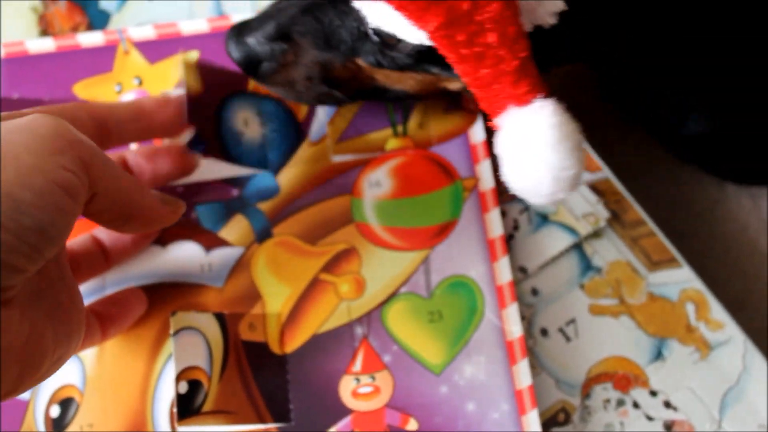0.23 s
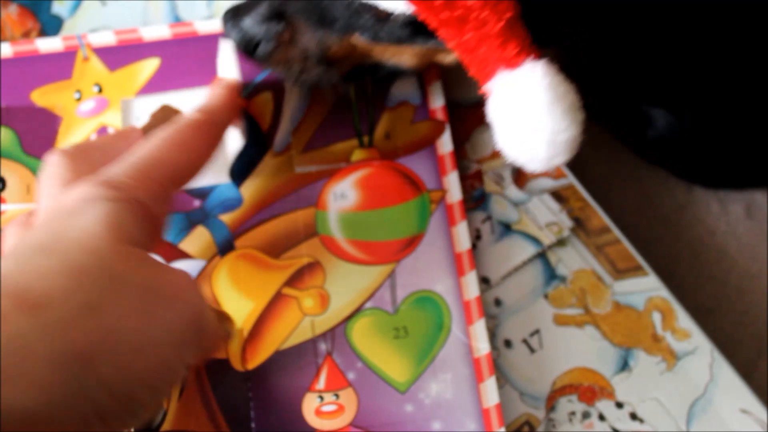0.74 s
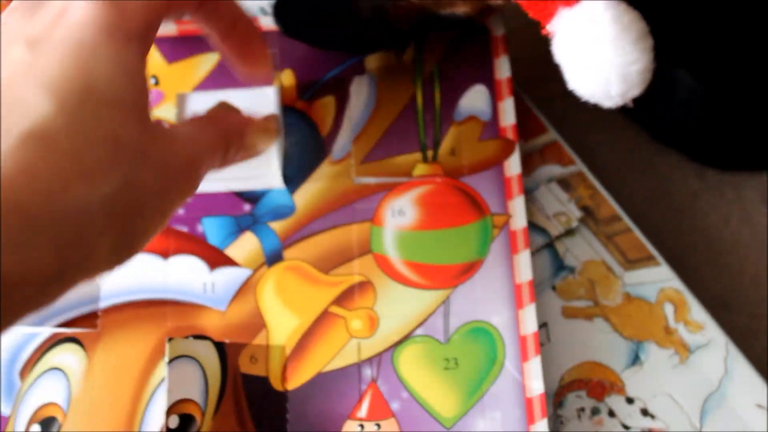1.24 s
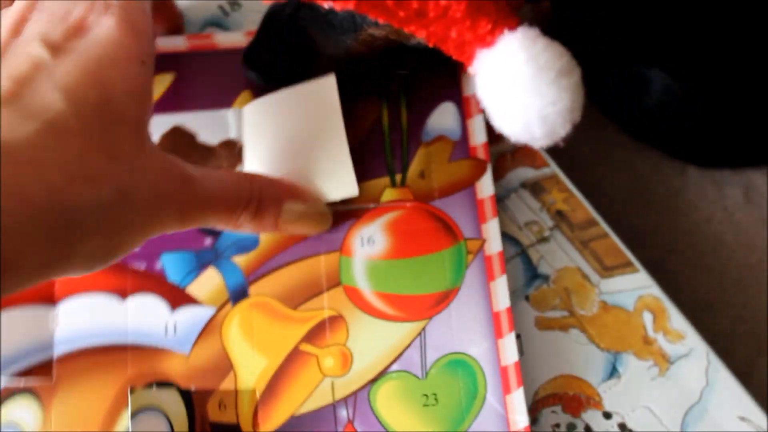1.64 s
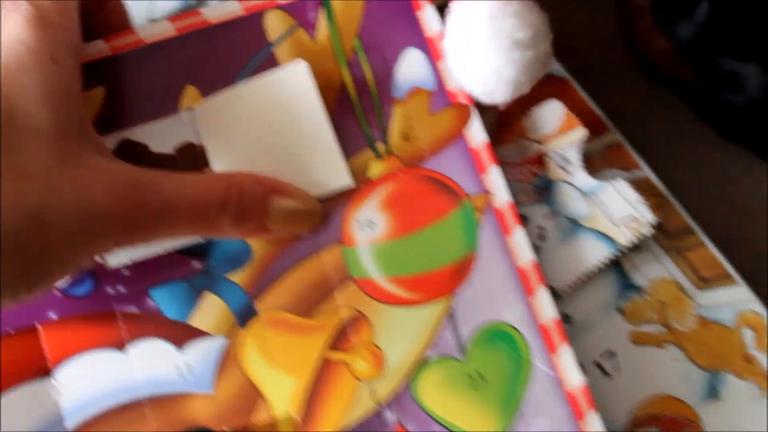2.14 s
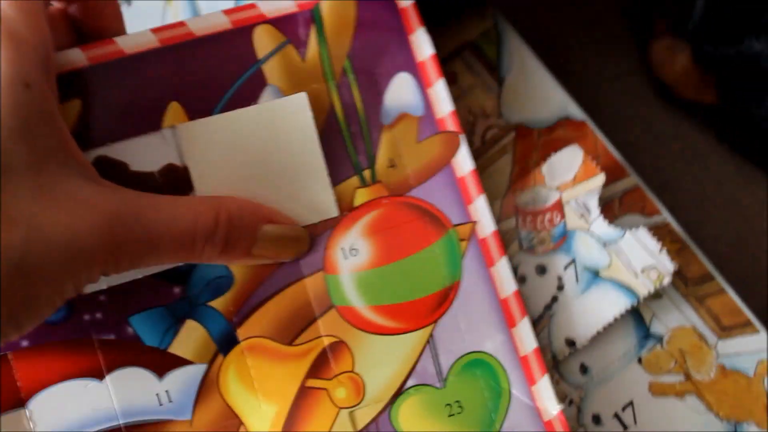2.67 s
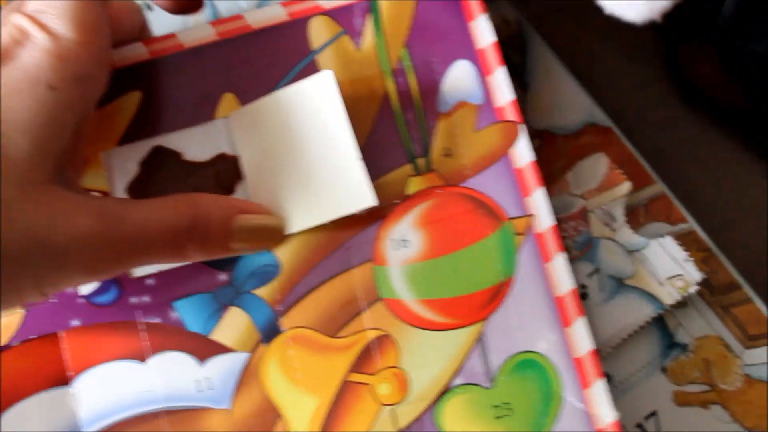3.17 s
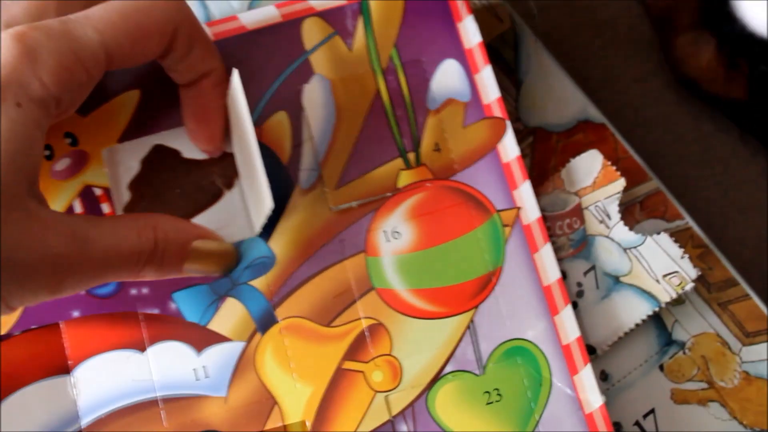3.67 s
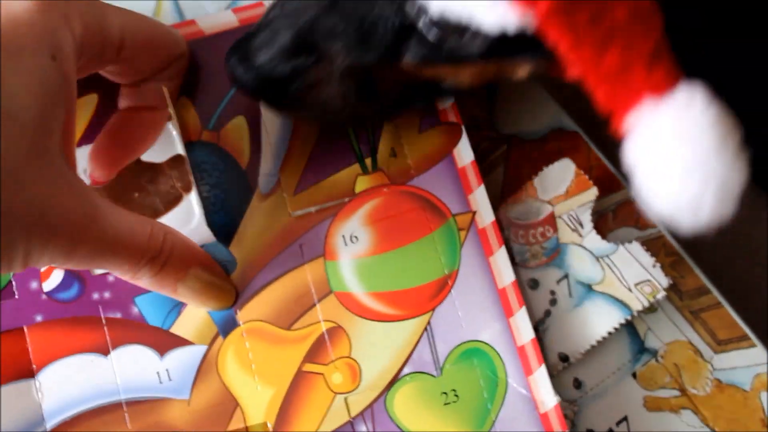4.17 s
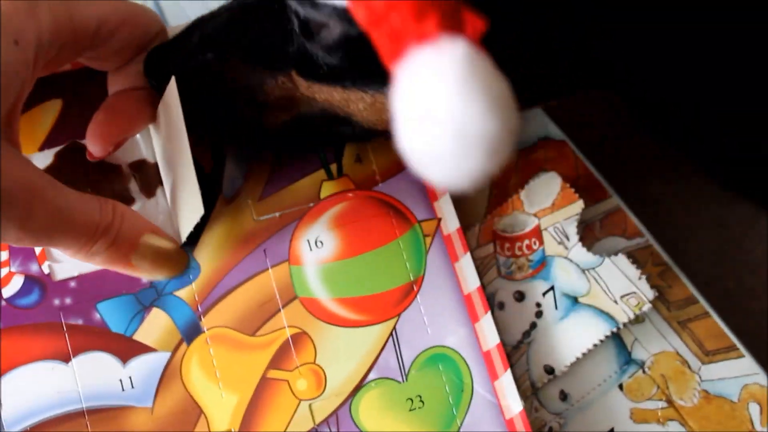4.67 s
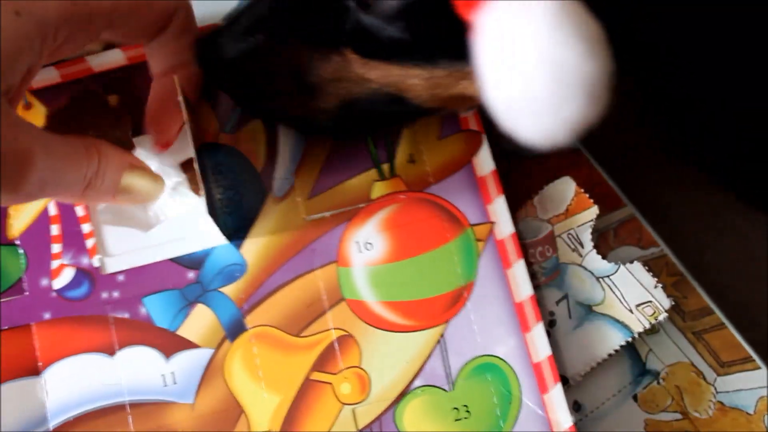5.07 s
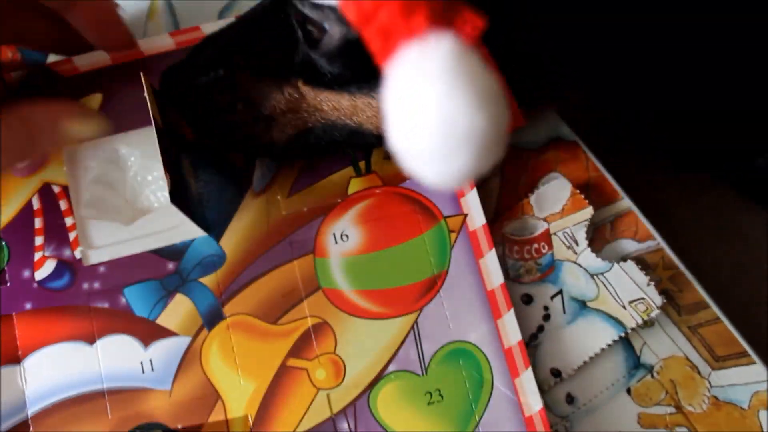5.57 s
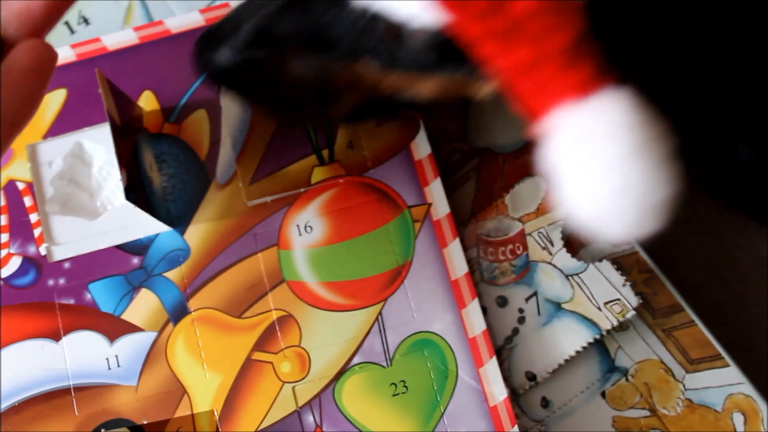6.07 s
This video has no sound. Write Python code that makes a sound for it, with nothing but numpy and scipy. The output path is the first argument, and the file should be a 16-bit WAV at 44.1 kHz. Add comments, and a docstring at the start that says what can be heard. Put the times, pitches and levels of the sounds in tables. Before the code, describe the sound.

A close, dry mono phone pickup in a small carpeted room, with quiet steady hiss, a faint wavering low hum and barely any rumble. Fine crackles start at once; at 0.3 s one hard, bright snap jumps out. From about 0.8 to 2 s fingers scrape the thin card in short gritty strokes, with small ticks and soft hollow box knocks. At 2.1 to 2.2 s clean plastic pops ring very briefly, and at 2.5 s a very loud snap clips the input. More snaps and a deeper pop follow at 2.7 to 3 s, then a bright pop at 3.4 s. Lighter scraping and crackling lead to another overloading crack at 4.5 s. Buckling grows dense from 4.6 to 5 s with sharp plastic snaps. Softer crackles, rubs and knocks continue to 5.8 s; then near stillness, with one last faint high snap at 6.3 s.

```python
"""A small carpeted room: fingers tear open a thin cardboard flap and press a plastic tray close to a phone, in mono.
An early hard snap gives way to scraping and knocks; clean pops and the loudest snaps, which overload the input,
follow from two seconds on, then dense buckling near five seconds, and a quieter end with one last faint snap.
Snaps are bursts of filtered noise, pops are ringing partials, knocks are slow booms and scraping is fine grains;
a brief room answer follows them, over a steady quiet hiss, a wavering hum and faint rumble."""
import sys
import numpy as np
from scipy import signal
from scipy.fft import rfft, irfft
from scipy.io import wavfile
from scipy.ndimage import uniform_filter1d

SR = 44100
rng = np.random.default_rng(int(sys.argv[2]) if len(sys.argv) > 2 else 0)


def generate_wav(sig):
    """Save sig (samples, or channels by samples) to the path in sys.argv[1] as 16-bit PCM at SR."""
    pcm = np.round(np.clip(np.atleast_2d(sig).T, -1, 1) * 32767).astype(np.int16)
    wavfile.write(sys.argv[1], SR, pcm)


def volts(x):
    """Linear amplitude factor 10**(x/20) for a level x in dB, scalar or array-like."""
    e = np.asarray(x, float) / 20
    return 10 ** e


N = 278271

# Clear buckling snaps of the tray, parts by peak: start_s, ring_hz, ring_db, thump_db, crack_db
BUCKLES = [(0.0446, 3340, -28, -30.5, -31.5), (0.221, 4300, -37.5, -56, -41),
           (0.2583, 4300, -36.5, -59, -37), (0.313, 2660, -5.5, -14, -6), (0.3109, 2500, -29, -31, -21),
           (0.319, 2240, -22, -48, -17.5), (0.331, 2280, -23, -28, -16), (0.49, 1520, -35, -30.5, -62),
           (0.513, 1580, -39, -34.5, -43), (0.566, 1500, -37.5, -30, -35), (0.821, 2140, -32, -60, -31),
           (0.8434, 1560, -31.5, -31, -34), (0.9118, 5840, -54, -39, -29.5), (0.976, 1998, -37, -52, -35.5),
           (0.992, 1540, -57, -36, -55), (1.0241, 1090, -56, -35, -43), (1.2123, 5470, -20, -31.5, -35),
           (1.2219, 1660, -27.5, -27, -45), (1.2364, 4400, -24, -41, -33), (1.295, 1508, -38, -28.5, -51),
           (1.3515, 1520, -47, -30, -58), (1.382, 5600, -45, -50, -37), (1.428, 1700, -41, -48, -40),
           (1.5043, 5470, -33, -44, -30), (1.579, 2126, -28, -25.5, -43), (1.633, 1683, -33, -21, -43),
           (1.649, 2464, -38, -54, -29), (1.679, 1150, -40, -30.5, -45.5), (1.7125, 1390, -22.5, -40, -59),
           (1.787, 6000, -42, -50, -31), (1.8013, 1381, -24.5, -21, -46), (1.8206, 1890, -20, -55, -45),
           (1.8692, 1430, -44, -30, -53), (1.881, 1453, -40, -33, -49), (1.9376, 1730, -41, -36, -48),
           (2.016, 2020, -22, -18, -28), (2.077, 1600, -33, -51, -39), (2.1056, 1730, -12.5, -23, -19),
           (2.1191, 3140, -13, -22.5, -19), (2.2129, 2960, -8.5, -23, -35), (2.3858, 1060, -35, -32.5, -43),
           (2.406, 1300, -49, -32, -42), (2.4188, 1290, -45, -34, -51), (2.439, 1146, -44, -33, -49),
           (2.452, 1534, -40, -33.5, -43), (2.467, 1500, -29.5, -33, -29.5),
           (2.4867, 1090, -37, -28.5, -30), (2.5074, 4330, 2, -7.5, 0), (2.6894, 2510, -7, -22, -8.5),
           (2.7298, 2950, -34, -42, -26), (2.737, 3610, -17, -48, -12), (2.7442, 1500, -16, -38, -36),
           (2.759, 2190, -8.5, -10.5, -25), (2.8523, 2770, -35.5, -44, -42),
           (2.9529, 4330, -6.5, -26.5, -4), (3.037, 2420, -22, -64, -11), (3.0432, 3620, -21, -29.5, -21),
           (2.943, 1740, -34, -45, -36), (3.099, 1496, -28.5, -59, -43), (3.107, 1540, -32, -39, -33.5),
           (3.1596, 2139, -20.5, -53, -27), (3.166, 1297, -33, -41, -43), (3.1761, 1270, -38, -24.5, -42),
           (3.341, 1369, -34.5, -29, -89), (3.399, 3850, -13, -54, -7.5), (3.484, 7130, -25.5, -28.5, -13),
           (3.544, 3660, -34, -39, -34), (3.6549, 1540, -38, -38, -38), (3.69, 1590, -38.5, -47, -36),
           (3.773, 1380, -32, -34.5, -27.5), (3.8932, 1590, -22.5, -32, -28), (3.903, 6000, -36, -45, -33),
           (3.918, 1800, -34, -39, -49), (3.952, 1650, -27, -40, -45), (4.0281, 1449, -20.5, -30, -46),
           (4.0431, 1500, -24, -39, -22.5), (4.0581, 3803, -19.5, -33, -23),
           (4.0975, 2300, -31.5, -32, -37), (4.148, 1440, -30.5, -43, -24), (4.1863, 1594, -30, -35, -54),
           (4.229, 6800, -38, -50, -39), (4.238, 6000, -42, -50, -38), (4.2488, 1850, -22, -24, -55),
           (4.283, 1580, -38, -37, -53), (4.305, 1250, -31, -35, -50), (4.325, 1266, -38, -18.5, -46),
           (4.3305, 1600, -23.5, -51, -19), (4.3517, 1790, -33.5, -31, -44),
           (4.4305, 1150, -29, -29.5, -35), (4.452, 946, -32.5, -44, -53), (4.467, 957, -49, -39, -32),
           (4.473, 9000, -42, -55, -36), (4.487, 3270, -19, -19, -34), (4.4917, 5150, 3.5, -15.5, -4),
           (4.6029, 3460, -18.5, -25.5, -52), (4.6294, 1650, -15.5, -35, -35),
           (4.6426, 1700, -25.5, -20, -30), (4.701, 1127, -31, -29, -49), (4.71, 3200, -16.5, -25.5, -50),
           (4.725, 1868, -31, -26.5, -53), (4.8036, 2030, -20.5, -26.5, -56),
           (4.8383, 4140, -5.5, -26, -19.5), (4.8714, 1790, -23.5, -27.5, -45),
           (4.886, 1708, -27, -32, -44), (4.898, 1640, -26, -29, -30), (4.914, 1510, -23.5, -26.5, -24),
           (4.932, 1968, -22, -27.5, -42.5), (4.9522, 4720, -2, -30, -11.5),
           (4.9526, 3200, -12.5, -40, -28), (4.972, 2800, -34, -36, -40), (4.995, 2500, -40, -43, -47),
           (5.002, 2400, -35, -38, -43), (5.027, 1499, -38, -41, -45), (5.079, 800, -37, -38, -55),
           (4.9463, 1510, -24, -41, -48), (5.0406, 5270, -28, -36, -31), (5.059, 1480, -30, -33, -34),
           (5.127, 1250, -29, -46, -47), (5.1429, 2350, -22.5, -39, -22), (5.3518, 3120, -31.5, -40, -24.5),
           (5.3861, 1640, -30, -54, -26), (5.4245, 800, -30.5, -34, -48), (5.438, 950, -32, -35, -52),
           (5.446, 600, -34, -30, -52), (5.491, 1280, -31, -34, -44), (5.5207, 1310, -35, -47, -39),
           (5.5453, 4904, -30, -43, -26), (5.6026, 5200, -18.5, -31, -28), (5.603, 1510, -26, -45, -50),
           (5.65, 1270, -37, -48, -41), (5.657, 1510, -37, -30.5, -49), (5.71, 1550, -36, -40, -44),
           (5.7454, 1050, -46, -34, -46), (5.754, 4200, -33, -64.5, -47.5), (6.2946, 5000, -51, -47, -26.5)]
# Hard pops of a tray cup: start_s, rise_ms, t60_ms, partials (pitch_hz, peak_db)
CUP_POPS = [(2.2129, .3, 13.6, [(3026, 6), (3356, -4.5), (1600, -17), (9370, -20.5)]),
            (3.3982, 1.44, 17, [(3740, -10.5), (3045, -16.5), (6130, -8.5), (8340, -11.5), (11050, -10.5)]),
            (0.3132, 1.8, 16.5, [(580, -6.5), (1400, -12)]), (2.7582, 1.06, 9, [(2350, -1)]),
            (2.7595, 1.95, 13.7, [(1108, -3.5), (800, -6)])]
# Dull knocks of the whole box against hand and floor: start_s, peak_db, pitch_hz
BOX_KNOCKS = [(0.844, -42, 315), (1.026, -36.5, 232), (1.208, -39, 211), (1.3, -43.5, 210),
              (1.43, -45, 190), (1.562, -42, 200), (1.6, -36, 190), (1.68, -41, 190), (1.805, -29, 242),
              (2.016, -56, 380), (2.102, -47, 384), (2.214, -25.5, 302), (2.501, -42.5, 370),
              (2.69, -39, 290), (2.757, -23, 258), (3.038, -49, 186), (3.339, -37.5, 312),
              (3.488, -41, 336), (3.771, -40.5, 300), (3.892, -44, 340), (4.031, -48, 229),
              (4.097, -40, 260), (4.202, -37, 256), (4.325, -41, 380), (4.491, -37.5, 183),
              (4.625, -29.5, 198), (5.37, -42.5, 200), (5.43, -39, 200), (5.443, -37, 250),
              (5.55, -42, 180), (5.659, -35, 403), (5.748, -38.5, 348), (5.775, -43, 290)]
# Steady contact of the fingers, read between points: time_s, box_db, sheet_db
CONTACT = [(0.0, -67, -73), (0.4, -65, -59.5), (0.7, -64, -65), (0.88, -48, -48), (1.02, -58, -59),
           (1.25, -49, -48), (1.4, -51, -55.5), (1.5, -48, -47), (1.6, -44.5, -43), (1.75, -43, -44.5),
           (1.93, -46.5, -47.5), (2.11, -51.5, -46.5), (2.34, -56, -61.5), (2.76, -54.5, -55),
           (3.37, -60, -54), (3.8, -57, -58), (4.05, -49, -50), (4.46, -52, -54), (4.75, -60, -53.5),
           (4.95, -45.5, -46), (5.03, -48, -51), (5.2, -61.5, -55.5), (5.4, -49, -48.5),
           (5.59, -49.5, -56.5), (5.779, -56, -56), (6.31, -63, -63)]
# Short slides of skin and torn card: start_s, length_ms, swell_share (of the length, 0-1), box_db, sheet_db
SKIN_SLIDES = [(0.524, 75, 0.3, -48.5, -43.5), (0.64, 48, 0.55, -53, -51), (0.726, 23, 0.34, -48.5, -51),
               (0.86, 41, .6, -53, -54), (0.95, 33, 0.55, -59, -43), (1.02, 170, 0.1, -46, -50),
               (1.086, 41, 0.28, -29, -30.5), (1.153, 35, 0.2, -41, -40), (1.381, 44, 0.5, -40, -44.5),
               (1.528, 50, 0.7, -26.5, -25), (1.799, 67, 0.3, -37.5, -43), (2.061, 64, 0, -43, -49),
               (2.387, 146, 0.1, -45.5, -53), (2.512, 36, 0.4, -36.5, -33.5),
               (2.737, 16, 0.6, -28.5, -21.5), (3.15, 34, 0.66, -35.5, -36.5), (3.301, 15, 0.5, -67, -42),
               (3.338, 110, 0.05, -41.5, -53), (3.53, 114, 0, -48, -47.5), (3.769, 114, 0.32, -48, -45),
               (3.875, 43, 0.7, -35.5, -44), (3.931, 55, 0.18, -37, -33.5), (4.202, 21, 0.7, -38.5, -67),
               (4.339, 81, 0.07, -45, -41.5), (4.41, 28, .7, -59, -42), (4.625, 13.7, 0.2, -25.5, -24.5),
               (4.89, 14.5, 0.75, -36, -32.5), (5.118, 50, 0.86, -40.5, -40.5),
               (5.367, 56, 0.27, -43, -38.5), (5.42, 32, 0.4, -37.5, -55), (5.54, 100, 0.17, -39.5, -41.5),
               (5.645, 42, 0.33, -51, -43.5), (5.744, 16.5, 0.7, -40, -59)]
# Resonances of the cardboard box: pitch_hz, width_hz, level_db
BOX_MODES = [(205, 120, -6), (290, 120, -4.5), (600, 322, -3), (1104, 634, -2), (1660, 650, -1),
             (2500, 640, -6)]
# Resonances of the thin plastic sheet: pitch_hz, width_hz, level_db
SHEET_MODES = [(2800, 1040, 1), (4640, 1700, 2), (6700, 2000, -1), (9100, 2600, -6), (12500, 2600, -17)]
# The hollow under the lid, shifting with the grip: time_s, pitch_hz, level_db (relative to the box contact)
LID_HOLLOW = [(0, 600, -5), (0.75, 680, -6), (0.9, 440, -6), (1.1, 520, -2), (1.18, 520, -7), (1.4, 560, 2),
              (1.44, 420.3, -1), (1.55, 520, -9.5), (1.7, 600, -7), (1.92, 499.6, -3.5), (2.1, 650, -12),
              (3.7, 630, -10.5), (3.93, 650.6, -5.5), (4.05, 649, -10), (4.8, 700, -8), (5.43, 700, -8.5),
              (5.56, 520, -6), (5.73, 570, -11), (6.31, 640, -9)]
# Thin high hisses that swell and fade: start_s, length_ms, centre_hz, level_db
AIRY_HISSES = [(1.38, 80, 9800, -59), (3.8, 30, 9500, -52), (3.932, 50, 9200, -46), (4.085, 88, 8800, -49),
               (6.26, 48, 8500, -52)]
# Decay of the room by pitch: pitch_hz, t60_s
ROOM_DECAY = [(250, 0.071), (1400, 0.12), (4000, 0.077), (10000, 0.13)]
# Spectrum shape of the background hiss: pitch_hz, level_db (per Hz)
HISS_SHAPE = [(18, -26.5), (30, -39), (70, -39.5), (124, -12.5), (384, -0.5), (616, -3), (3060, -6.5),
              (10500, -19.5), (14400, -27), (16000, -43)]
# A low household hum that wavers: time_s, level_db
HUM_LEVEL = [(0, -75), (1.5, -78), (3, -73.5), (4.5, -74), (6.31, -70)]


def unit(x):
    """Scale to rms 1."""
    return x / np.sqrt(np.mean(x ** 2))


def peak(x, db):
    """Scale to a peak level."""
    return x * volts(db) / np.max(np.abs(x))


def ring(x, hz, width):
    """One resonance, gain 1 at its centre."""
    hz = min(hz, 0.44 * SR)
    b, a = signal.iirpeak(hz, max(hz / width, 0.3), fs=SR)
    return signal.lfilter(b, a, x)


def band(x, lo_hz, hi_hz):
    """Steep band-pass."""
    return signal.sosfilt(signal.butter(2, [lo_hz, hi_hz], "band", fs=SR, output="sos"), x)


def walk(rate):
    """Random levels held 1 / rate s and slewed; spread near 1."""
    k = int(SR / rate)
    held = np.repeat(rng.standard_normal(N // k + 1), k)
    return unit(uniform_filter1d(held, k)[:N])


def body(x, modes, patchy_db=0):
    """The resonances of a thing; a moving finger favours now one, now another."""
    out = np.zeros(len(x))
    for k, (hz, width, db) in enumerate(modes):
        favour_db = patchy_db * walk(16) if patchy_db else 0
        out += (-1) ** k * volts(db + favour_db) * ring(x, hz, width)
    return out


def coloured(points, size):
    """Noise of rms 1 whose spectrum follows points of pitch and level."""
    hz, db = np.transpose(points)
    f = np.maximum(np.arange(size // 2 + 1) * SR / size, 1)
    gain = volts(np.interp(np.log(f), np.log(hz), db))
    return unit(irfft(rfft(rng.standard_normal(size)) * gain, size))


def snaps():
    """Each buckle is a short burst of slips: it rings the bent panel, thumps the box and cracks in the treble."""
    burst_ms, burst_ms_per_db = 15.4, 0.31  # t60 at ring level 0 dB, and how much longer for each dB softer
    settle_db, settle_s = -39, 0.19  # the sheet rustles on: level and t60
    ring_width = 0.28  # share of the ring pitch
    spread_share, spread_db = 0.36, 2  # card level: share of the way from ring to thump, then a lift
    out = np.zeros(N + 2048)
    t = np.arange(2048) / SR
    rows = [*crackles(), *BUCKLES]
    noise = rng.standard_normal((len(rows), 3, 2048))
    for (s, hz, ring_db, thump_db, crack_db), n in zip(rows, noise):
        t60 = max(burst_ms - burst_ms_per_db * ring_db, 2) / 1000
        settle = volts(settle_db - 60 * t / settle_s) * (1 - t / t[-1])
        fade = np.minimum(t / 0.00031, 1) * (volts(-60 * t / t60) + settle)

        # the first release of the buckle is one clean kick; the ragged slips follow it
        kick = 6.2 * signal.unit_impulse(2048, idx=12) + n[0] * fade
        panel = ring(ring(kick, hz, ring_width * hz), hz, 1.5 * hz)

        # the card answers widely
        card_db = ring_db + spread_share * (thump_db - ring_db) + spread_db
        card = peak(band(kick + n[1] * fade, 1095, 3270), card_db)

        # the box is soft and slow: it is pushed as well as shaken, and its middle modes answer
        shove = 2.6 * np.sin(np.pi * np.minimum(t / 0.00083, 1))
        push = n[1] * np.minimum(t / 0.0002, 1) * fade + shove
        thump = band(body(push, BOX_MODES), 402, 1906)

        # the treble dies faster
        crack = band(n[2] * fade ** 2.31, 5200, 10400)
        i = int(s * SR)
        out[i:i + 2048] += peak(panel, ring_db) + card + peak(thump, thump_db) + peak(crack, crack_db)
    return out[:N]


def crackles():
    """Rows for small snaps at chance moments, as strong as the fingers press."""
    count, lowest_hz, octaves = 100, 1050, 1.7
    over_contact_db, scatter_db = (4, 5.5, -7), 5.5  # ring, thump and crack peaks over the contact level
    when, pitch = rng.random((count, 2)).T
    s = when * N / SR
    box_db, sheet_db = contact(s)
    scatter = scatter_db * rng.standard_normal((count, 3)).clip(-2, 1.5)
    db = np.transpose([sheet_db, box_db, sheet_db]) + over_contact_db + scatter
    hz = lowest_hz * 2 ** (octaves * pitch ** 2)  # low pitches are commoner
    return np.column_stack([s, hz, db])


def pops():
    """A dented cup springs back and rings its few partials."""
    ragged = 0.4  # narrow noise added to each clean partial
    out = np.zeros(N)
    t = np.arange(4096) / SR
    for s, rise_ms, t60_ms, partials in CUP_POPS:
        fade = np.minimum(t * 1000 / max(rise_ms, 0.1), 1) * volts(-60 * t * 1000 / t60_ms)
        i = int(s * SR)
        for hz, db in partials:
            wobble = unit(ring(rng.standard_normal(len(t)), hz, 0.14 * hz))
            tone = np.sin(2 * np.pi * hz * t) + ragged * wobble
            out[i:i + len(t)] += peak(fade * tone, db)
    return out


def knocks():
    """Soft pushes that set the box booming for a few ragged cycles."""
    rise_s, t60_s = 0.0052, 0.052
    out = np.zeros(N + 4096)
    t = np.arange(4096) / SR
    noise = rng.standard_normal((len(BOX_KNOCKS), 4096))
    fade = np.minimum(t / rise_s, 1) * volts(-60 * t / t60_s)
    for (s, db, hz), n in zip(BOX_KNOCKS, noise):
        ragged = 2.2 * unit(band(n, 0.73 * hz, 1.87 * hz))
        boom = np.sin(2 * np.pi * hz * t) + ragged
        i = int(s * SR)
        out[i:i + 4096] += peak(fade * boom, db)
    return out[:N]


def handling():
    """Scraping drives the hollow box in the middle range and the thin sheet in the treble."""
    patchy_db = 1.8  # spread of each resonance's wandering level
    smooth = 0.45  # even friction noise added under the sheet's grains
    power = volts(contact(np.arange(N) / SR)) ** 2  # rows: box, sheet
    for start, ms, swell, *db in SKIN_SLIDES:
        i, size = int(start * SR), int(ms * SR / 1000)
        crest = np.clip(swell, 0.05, 0.95)
        shape = np.interp(np.arange(size) / size, [0, crest, 1], [0.4, 1, 0.4]) ** 1.6
        power[:, i:i + size] += (volts(np.array(db))[:, None] * shape) ** 2
    box_level, sheet_level = np.sqrt(power)
    slips = grains()
    box = unit(band(body(slips, BOX_MODES, patchy_db), 165, 5000))
    rub = slips + smooth * rng.standard_normal(N)
    sheet = unit(body(rub, SHEET_MODES, patchy_db))
    return lid() * box_level + box * box_level + sheet * sheet_level


def contact(t):
    """Levels of box and sheet contact in dB at times t."""
    s, *levels = np.transpose(CONTACT)
    return np.array([np.interp(t, s, db) for db in levels])


def grains():
    """Stick-slip clicks of uneven but bounded size over smooth friction, under a trembling pressure."""
    grains_per_s, spread_db = 1500, 3.2
    hit = rng.random(N) < grains_per_s / SR
    uneven = volts(spread_db * np.minimum(rng.exponential(size=N), 3))
    clicks = unit(hit * uneven * rng.standard_normal(N))
    friction = 0.7 * rng.standard_normal(N)
    return (clicks + friction) * volts(2 * walk(180))


def lid():
    """Rubbing grains heard through a hollow whose pitch moves."""
    width_hz, wander, patchy_db = 147, 0.07, 3.5  # wander is a share of the pitch
    s, hz, db = np.transpose(LID_HOLLOW)
    t = np.arange(N) / SR
    low_pass = signal.butter(2, width_hz / 2, fs=SR, output="sos")
    slow = signal.sosfilt(low_pass, [grains(), grains()])
    pitch_hz = np.interp(t, s, hz) * (1 + wander * walk(14))
    turn = 2 * np.pi * np.cumsum(pitch_hz) / SR
    # two slow signals on a turning carrier make a noise band around the moving pitch
    hollow = slow[0] * np.cos(turn) + slow[1] * np.sin(turn)
    return unit(band(hollow, 250, 1400)) * volts(np.interp(t, s, db) + patchy_db * walk(30))


def hisses():
    """Smooth airy noise in a wide treble band."""
    out = np.zeros(N + SR)
    for s, ms, hz, db in AIRY_HISSES:
        size = int(ms * SR / 1000)
        air = unit(ring(rng.standard_normal(8192), hz, 0.4 * hz))[:size]
        swell = np.sin(np.pi * np.arange(size) / size) ** 0.5
        i = int(s * SR)
        out[i:i + size] += volts(db) * air * swell
    return out[:N]


def room(x):
    """Near surfaces scatter at once, the walls answer a little later; each band dies at its own rate."""
    wall_s = 0.023
    t = np.arange(12000) / SR
    tail = np.zeros(len(t))
    for hz, t60 in ROOM_DECAY:
        scatter = ring(rng.standard_normal(len(t)), hz, 1.05 * hz)
        tail += scatter / np.sqrt(hz) ** 1.19 * volts(-60 * t / t60)
    tail *= np.minimum(t / 0.0014, 1) * (1 + 0.73 * (t > wall_s))
    return signal.fftconvolve(x, tail / np.sqrt(np.sum(tail ** 2)))[:N]


def room_tone():
    """Even hiss, a narrow wavering hum and a faint rumble under it."""
    hiss_db, rumble_db, hum_hz = -55, -86, 77.1
    hiss = volts(hiss_db) * coloured(HISS_SHAPE, N + N % 2)[:N]  # even size for the transform
    s, db = np.transpose(HUM_LEVEL)
    hum = unit(ring(rng.standard_normal(N), hum_hz, 18)) * volts(np.interp(np.arange(N) / SR, s, db))
    rumble = volts(rumble_db) * unit(band(rng.standard_normal(N), 15, 45))
    return hiss + hum + rumble


def scene():
    """Close sources and their room answer over the room tone; the close sources carry no deep bass."""
    near_low_hz, room_db = 85, -14
    near = snaps() + pops() + knocks() + handling() + hisses()
    near = signal.sosfilt(signal.butter(2, near_low_hz, "high", fs=SR, output="sos"), near)
    mix = near + volts(room_db) * room(near) + room_tone()
    return mix[None]  # one channel


def top_cut(x):
    """Nothing passes above the cut-off."""
    return signal.sosfilt(signal.butter(12, 16850, fs=SR, output="sos"), x)


def record(dry):
    """The phone's microphone rolls off the top; the input clips flat at full scale."""
    gentle = signal.butter(2, 13000, fs=SR, output="sos")
    steep = signal.ellip(6, 0.5, 35, 15400, fs=SR, output="sos")
    heard = signal.sosfilt(np.vstack([gentle, steep]), dry)
    mix = np.clip(heard, -1, 1)
    return top_cut(mix)


dry = scene()
out = record(dry)
generate_wav(out)
```